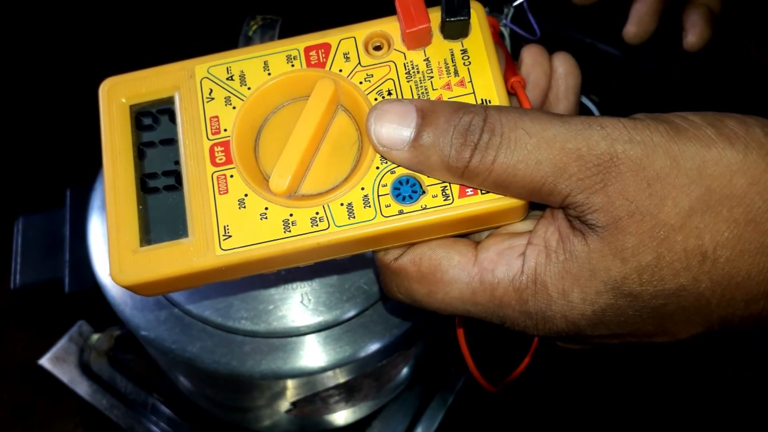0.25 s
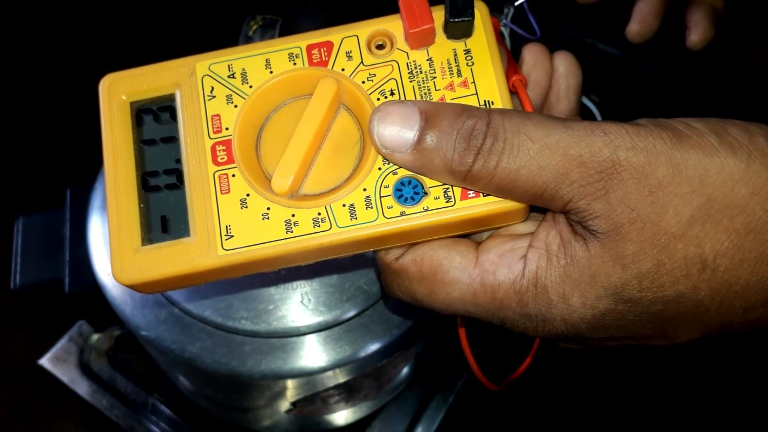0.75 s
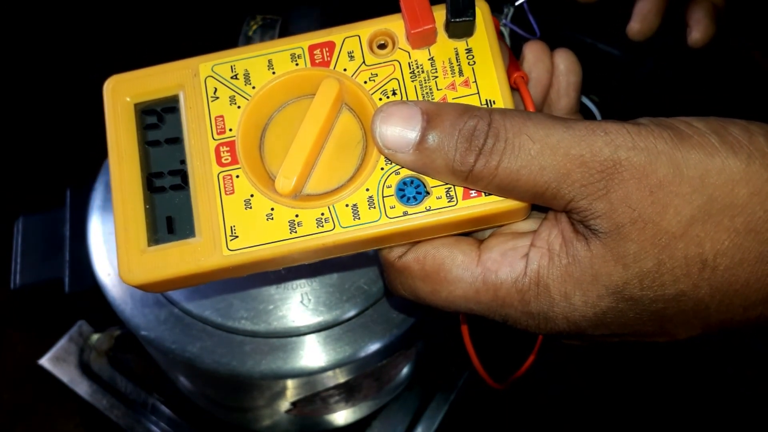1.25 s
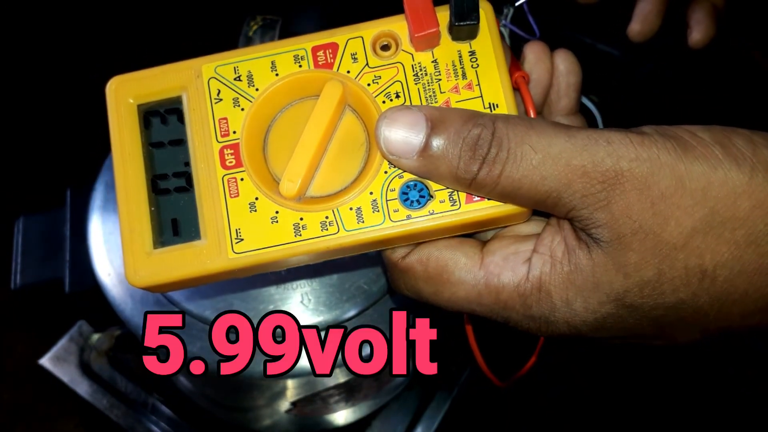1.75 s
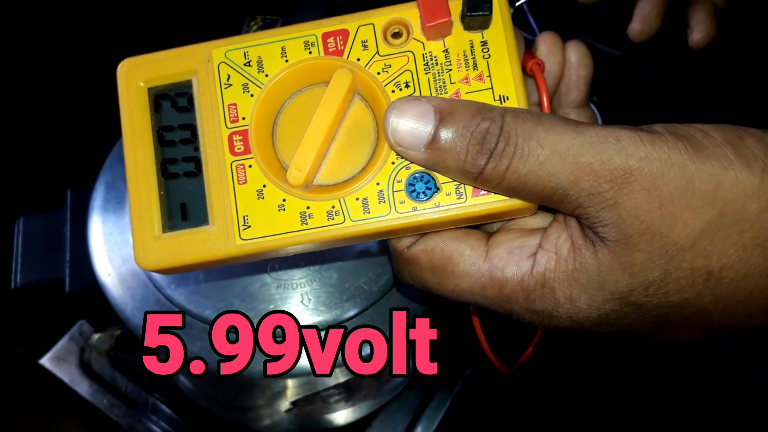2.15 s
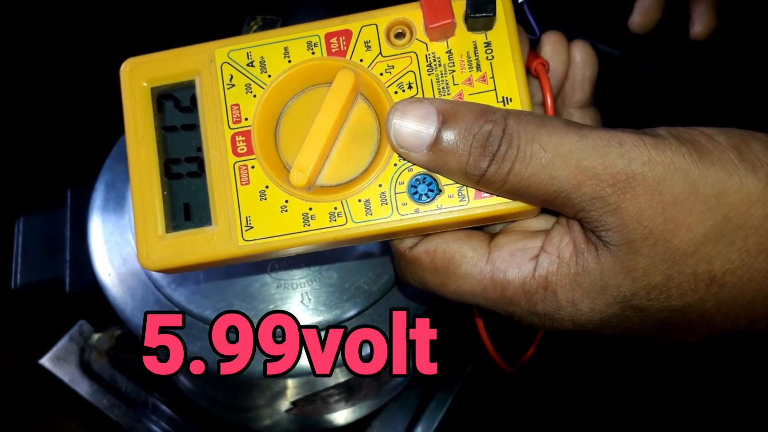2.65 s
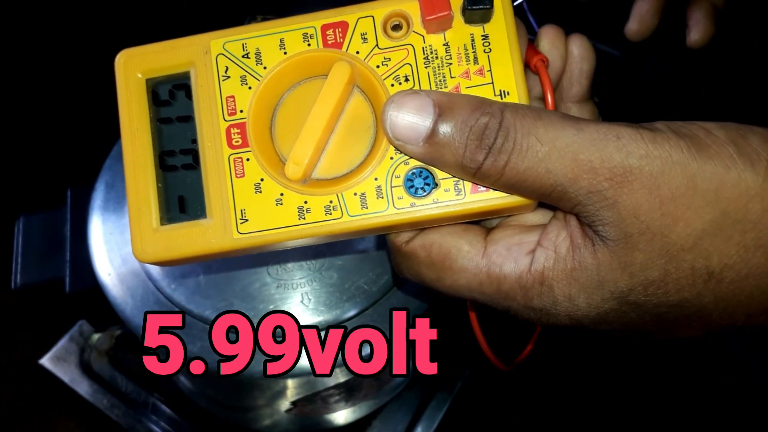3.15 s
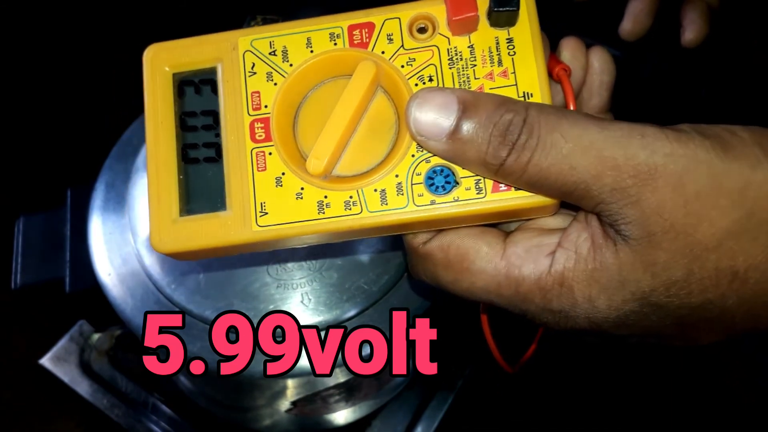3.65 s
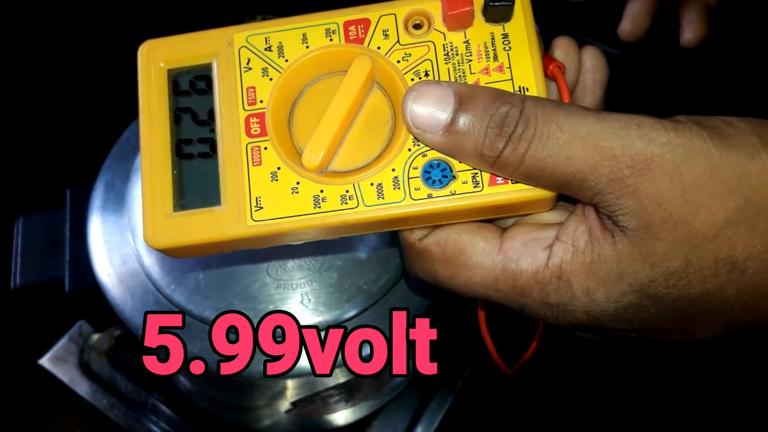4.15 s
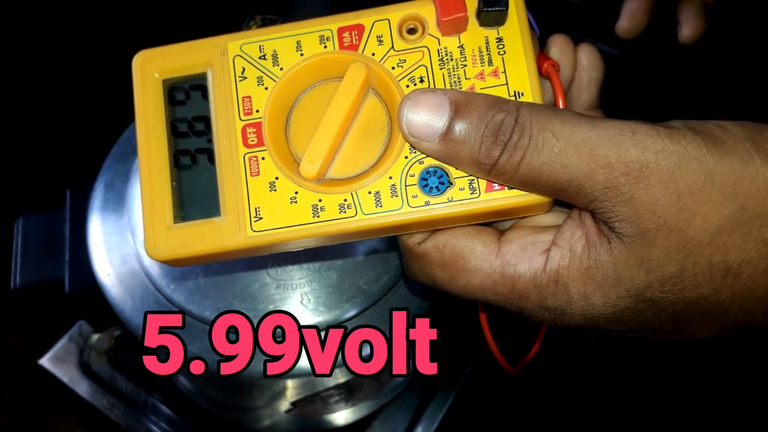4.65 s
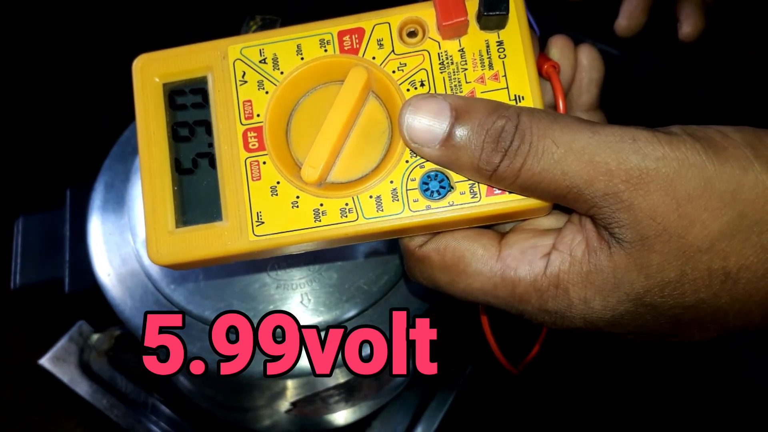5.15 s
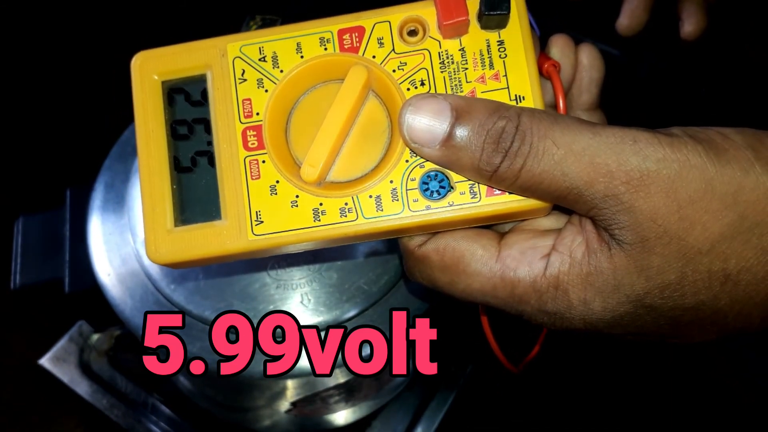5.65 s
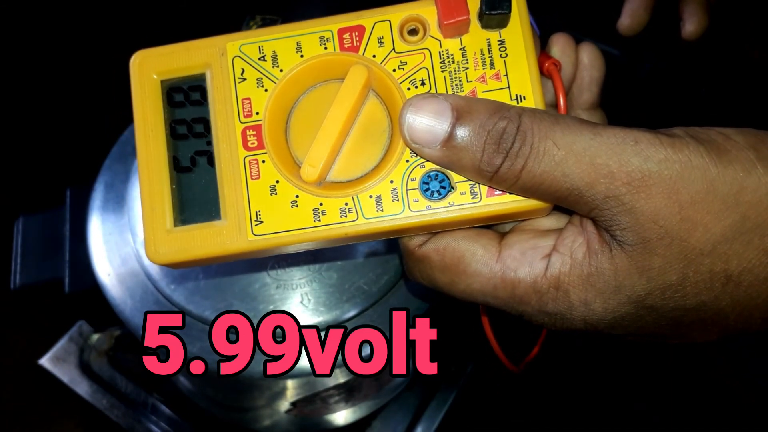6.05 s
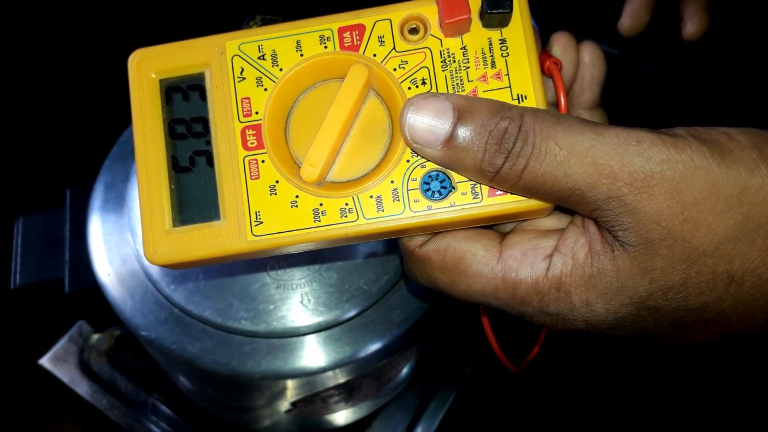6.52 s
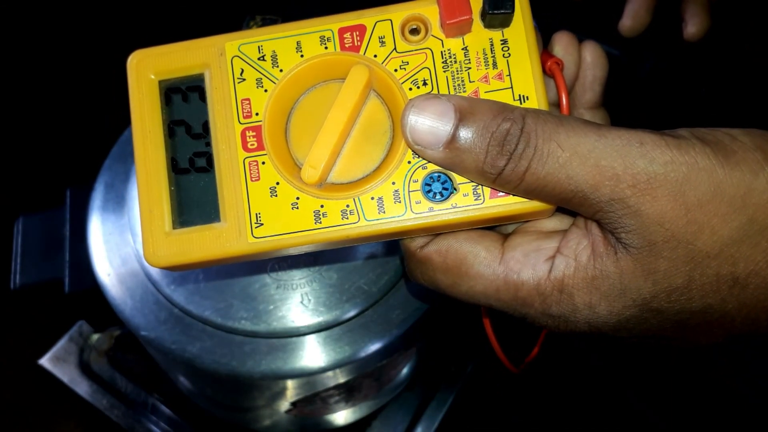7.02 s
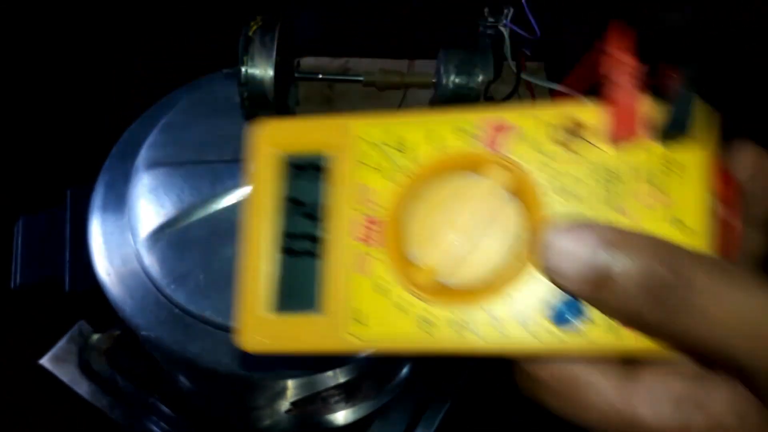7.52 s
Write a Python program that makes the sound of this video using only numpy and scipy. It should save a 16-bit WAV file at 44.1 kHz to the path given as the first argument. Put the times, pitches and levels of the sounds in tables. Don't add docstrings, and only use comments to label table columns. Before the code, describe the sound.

Continuous close steam jet chopped by spinning blades into a rough, buzzing hiss, over a very quiet uneven hum from a tiny generator on wood.

```python
import sys
import numpy as np
from scipy import signal
from scipy.io import wavfile
from scipy.ndimage import uniform_filter1d

SR = 44100
rng = np.random.default_rng(int(sys.argv[2]) if len(sys.argv) > 2 else 0)


def natural_amplitude(level_db):
    exponent = np.asarray(level_db, float) / 20
    return 10 ** exponent


def transcribe(signal):
    frames = np.atleast_2d(signal).T
    limited = np.clip(frames, -1, 1)
    pcm = np.round(limited * 32767).astype(np.int16)
    wavfile.write(sys.argv[1], SR, pcm)


N = 343092

# [t/s, level/dB]
PRESSURE = [(0.0, -17), (0.02, -19.5), (0.76, -18.5), (2.38, -19), (3.01, -16), (3.14, -18), (3.83, -19),
            (4.44, -20.5), (4.92, -19), (5.05, -19.5), (5.41, -17.5), (6.07, -18.5), (6.3, -18),
            (6.46, -20), (6.65, -18), (7.15, -19.5), (7.43, -17), (7.78, -15.5)]
PRESSURE_SHARE = [0.11, 0.88, 1.35]
ZONES_HZ = [2600, 8000, 13500]
# [t/s, level/dB]
HAND_SHADE = [
    (0, 2.5),
    (.2, 2),
    (1.1, -0.5),
    (3.2, 0.2),
    (3.75, 0),
    (4.9, -0.8),
    (5.9, .5),
    (6.6, -0.7),
    (7.78, -0.2),
]
# [t/s, length/s, level/dB]
CHOKES = [(1.7, .08, 2), (2.3, .3, -0.5), (2.9, .15, -2), (3.5, 0.072, -1.5), (3.82, .1, 1),
          (4.2, 0.087, -2.5), (4.5, .07, -2), (5.35, .15, 1.2), (6.27, .08, 1.5), (6.78, .08, 1),
          (6.95, .12, -1), (7.6, .2, -1.2)]
# [f/Hz, density/(dB per Hz)]
HISS_COLOUR = [(700, -26), (900, -27), (1500, -13), (1900, -12.5), (2300, -8), (3300, -9), (4600, -8),
               (5600, -3), (7000, -6), (8200, -9), (10000, -3.5), (12300, -5.5), (14000, -5), (16000, -14)]
# [f/Hz, chopped share/0-1, crispness/0-1]
CHOPPED = [(900, .18, .5), (2500, .24, .7), (4200, .4, .3), (6500, .42, .3), (10000, .56, .5),
           (14000, .56, .95)]
BLADES_DB = [1, -2, -4, -3, -3, 2, 3.5, .5]
# [f/Hz, width/Hz, lift/dB]
HOUSING = [(1405, 19, -2.5), (1735, 57, 3.5), (2063, 176, 4), (2555, 537, 8), (3935, 210, 4.5),
           (4260, 170, 2.5), (5800, 99, 4), (5550, 350, 2.5), (6790, 180, 2.5), (7020, 460, 6.5),
           (9040, 800, 7.5), (10490, 400, 6.5), (997, 80, 9), (11370, 160, 1.5)]
BLADE_LEAD = .06
JET_DB, DRONE_DB = -17.5, -44
SIZZLE_WAVER_DB = .4
TOP_PATCHY_DB = 0.7

# [t/ms, gain]
DULL_ECHOES = [(2.31, 0.07), (3.2, -0.07), (5.08, -0.06), (5.37, 0.06), (5.69, 0.15), (7.05, 0.06),
               (7.32, 0.05), (8.93, 0.05), (9.34, 0.06), (10.7, -0.05), (11.02, -0.07), (11.52, 0.05)]
# [t/ms, gain]
BRIGHT_ECHOES = [(2.7, 0.03), (3.15, -0.03), (4.78, 0.03), (4.99, -0.03), (5.19, 0.03), (5.42, 0.03),
                 (5.62, 0.06), (5.71, -0.03), (5.78, -0.03), (6.01, -0.03), (6.85, 0.04), (6.92, -0.03),
                 (7.23, 0.03), (9.25, 0.03)]
SPLIT_HZ = 4600
ROOM_T60_S, ROOM_DB, ROOM_CUT_HZ = .16, -12.5, 4300

# [t/s, turns per s]
SPEED = [(0.0, 43.8), (0.08, 44.4), (0.89, 44.8), (1.58, 43.6), (2.27, 45.5), (2.73, 43.8), (3.01, 43.5),
         (3.92, 44.2), (3.99, 44.8), (4.53, 43.7), (5.68, 43.6), (5.79, 44.3), (6.35, 44.4), (6.54, 45.0),
         (6.98, 44.8), (7.26, 43.8), (7.69, 43.4), (7.78, 43.8)]
# [multiple of speed, rms level/dB]
HUM = [(2, -71.0), (3, -64.6), (5, -59.9), (7, -55.3), (8, -57.0), (10, -69.2), (11, -55.4), (13, -61.2),
       (14, -63.0), (15, -54.0), (16, -54.1), (17, -59.0), (18, -60.9), (21, -64.5), (24, -56.1),
       (25, -59.0), (28, -60.0), (29, -59.6), (32, -55.4)]
EXCITES = {7: 1, 11: 2}
PAIR_TONES = (16, 24)
PAIR_DB_PER_HZ = 2.5

# [f/Hz, density/(dB per Hz)]
DRONE_COLOUR = [(25, -33), (45, -29), (80, -18), (195, -15.5), (240, -11), (330, -6.5), (455, -10.5),
                (600, -6.5), (850, -17), (1300, -10.5)]
# [f/Hz, width/Hz, level/dB]
BASE_MODES = [
    (245.5, 6.3, 4),
    (293.6, 17, -3.5),
    (484, 6.1, -4.5),
]
REST_DB = [-57, -50.5, -56]
DETUNE_DB_PER_HZ = [1, -3, -1.5]
# [t/s, length/s, level from rest/dB]
LOW_SWELLS = [
    (.37, 0.071, 9),
    (1.71, .1, 5),
    (2.27, .15, 4),
    (2.86, .12, -11),
    (3.38, 0.13, 7.5),
    (3.96, .08, 7),
    (5.07, 0.14, 7),
    (6.0, .1, 9.5),
]
# [t/s, length/s, level from rest/dB]
MIDDLE_SWELLS = [(.4, .1, 6), (1.4, 0.17, 5.5), (2.05, 0.13, -9), (2.86, 0.2, 5), (3.55, 0.084, 7),
                 (4.4, .2, 5.5), (5.5, .25, 6.5), (6.2, .1, 9.5), (6.5, .06, -12), (6.65, .1, 6),
                 (7.11, .15, 9.5)]
# [t/s, length/s, level from rest/dB]
HIGH_SWELLS = [(.45, .1, 8), (1.06, 0.071, 14), (1.38, .1, 13), (1.71, 0.055, 4), (2.1, .1, 7),
               (2.95, .1, -9), (4.22, 0.23, 10.5), (4.9, .3, 5), (5.87, .08, 12), (6.4, 0.067, 7),
               (6.8, 0.32, 5)]

# [f/Hz, width/Hz, lift/dB]
PORT = [(14000, 710, 4)]
CUTOFF_HZ = 15490


def rms_one(x):
    return x / np.sqrt(np.mean(x ** 2) + 1e-20)


def in_time(rows):
    s, *columns = np.transpose(rows)
    return [np.interp(np.arange(N) / SR, s, c) for c in columns]


def at_hz(points, hz, column=1):
    table = np.array(points)
    return np.interp(np.log(hz), np.log(table[:, 0]), table[:, column])


def swells(rows):
    t = np.arange(0, N + 64, 64) / SR
    bumps = sum(db * np.exp(-((t - s) / length) ** 2) for s, length, db in rows)
    return np.interp(np.arange(N) / SR, t, bumps)


def drift(*rates_and_spreads):
    hop, settle = 40, 2000
    slow = 0
    for rate, spread in rates_and_spreads:
        r = np.exp(-2 * np.pi * hop * rate / SR)
        noise = rng.standard_normal(N // hop + settle + 2)
        smooth = signal.lfilter([1], [1, -2 * r, r * r], noise)[settle:]
        slow = slow + spread * rms_one(smooth)
    return np.interp(np.arange(N) / hop, np.arange(len(slow)), slow)


def band(x, low_hz, high_hz):
    return signal.sosfilt(signal.butter(2, [low_hz, high_hz], "band", fs=SR, output="sos"), x)


def ring(x, hz, width):
    r = np.exp(-np.pi * width / SR)
    poles = [1, -2 * r * np.cos(2 * np.pi * hz / SR), r * r]
    return signal.lfilter([(1 - r * r) / 2, 0, (r * r - 1) / 2], poles, x)


def lift(x, modes):
    for hz, width, lift_db in modes:
        x = x + (natural_amplitude(lift_db) - 1) * ring(x, hz, width)
    return x


def strikes(turns, fade, spread_db):
    place = 8 * turns - BLADE_LEAD
    blade = np.floor(place).astype(int) + 1
    part = place % 1
    uneven_db = spread_db * rng.standard_normal(4000)[blade]
    force_db = np.array(BLADES_DB)[(blade - 1) % 8] + uneven_db
    return rms_one(natural_amplitude(force_db) * part * np.exp(-part / fade))


def hiss_swells_db():
    pressure_db, = in_time(PRESSURE)
    swells_db = np.outer(PRESSURE_SHARE, pressure_db - pressure_db.mean())
    swells_db[0] += in_time(HAND_SHADE)[0]
    swells_db[2] += swells(CHOKES) + drift((4, SIZZLE_WAVER_DB))
    return swells_db


def jet(turns):
    swells_db = hiss_swells_db()
    white = rng.standard_normal((4, N))
    droplets = rms_one(natural_amplitude(1.6 * np.minimum(rng.exponential(1, N), 5)))
    crisp = strikes(turns, fade=.24, spread_db=1.5)
    blurred = rms_one(uniform_filter1d(crisp, size=125))
    gust_db = drift((12.0, .25))
    out = 0
    edges = np.geomspace(650, 17500, 26)
    for k, (low, high) in enumerate(zip(edges, edges[1:])):
        hz = np.sqrt(low * high)
        share, crispness = np.clip([at_hz(CHOPPED, hz), at_hz(CHOPPED, hz, column=2)], 0, 1)
        spatter = np.roll(droplets, 999 * (k // 3))
        chop = spatter * (crispness * crisp + (1 - crispness) * blurred)
        free_jet = np.sqrt(1 - share) * white[k % 2]
        chopped_jet = np.sqrt(share) * chop * white[2 + k % 2]
        zone = np.interp(np.log(hz), np.log(ZONES_HZ), [0, 1, 2])
        swell_db = sum(max(0, 1 - abs(zone - z)) * s for z, s in enumerate(swells_db))
        patchy_db = 0.43 + TOP_PATCHY_DB * max(0, zone - 1)
        flicker_db = gust_db + drift((2.2, patchy_db), (15, .45))
        level = natural_amplitude(at_hz(HISS_COLOUR, hz) + swell_db + flicker_db)
        out = out + level * band(free_jet + chopped_jet, low, high)
    return natural_amplitude(JET_DB) * rms_one(lift(out, HOUSING))


def echoes(x, table, strength):
    taps = np.zeros(SR // 50)
    taps[0] = 1
    for ms, gain in table:
        taps[round(ms * SR / 1000)] += strength * gain
    return signal.fftconvolve(x, taps)[:N]


def near_surfaces(hiss):
    dull = signal.sosfiltfilt(signal.butter(4, SPLIT_HZ, fs=SR, output="sos"), hiss)
    bright = hiss - dull
    return echoes(dull, DULL_ECHOES, strength=1.46) + echoes(bright, BRIGHT_ECHOES, strength=0.72)


def room(x):
    t = np.arange(SR // 4) / SR
    tail = rng.standard_normal(len(t)) * natural_amplitude(-60 * t / ROOM_T60_S) * (t > .004)
    tail = band(tail, ROOM_CUT_HZ, 15400)
    return signal.fftconvolve(x, natural_amplitude(ROOM_DB) * tail / np.sqrt(np.sum(tail ** 2)))[:N]


def ringing_db(speed):
    rest_db = np.array(REST_DB)[:, None] + np.outer(DETUNE_DB_PER_HZ, speed - speed.mean())
    return rest_db + [swells(rows) for rows in (LOW_SWELLS, MIDDLE_SWELLS, HIGH_SWELLS)]


def shaft(turns, speed, modes_db):
    out = 0
    for multiple, level_db in HUM:
        phase = 2 * np.pi * (multiple * turns + rng.random()) + drift((3, .25))
        swell_db = drift((2, 2.))
        if multiple in EXCITES:
            mode_db = modes_db[EXCITES[multiple]]
            swell_db = mode_db - mode_db.mean()
        if multiple in PAIR_TONES:
            swell_db = 0.49 * swell_db + PAIR_DB_PER_HZ * (speed - speed.mean())
        out = out + np.sqrt(2) * natural_amplitude(level_db + swell_db) * np.sin(phase)
    return out


def base(modes_db):
    white = rng.standard_normal((5, N))
    rumble = 0
    edges = np.geomspace(20, 1500, 16)
    for k, (low, high) in enumerate(zip(edges, edges[1:])):
        level_db = at_hz(DRONE_COLOUR, np.sqrt(low * high)) + drift((2.5, .8))
        rumble = rumble + natural_amplitude(level_db) * band(white[k % 2], low, high)
    out = natural_amplitude(DRONE_DB) * rms_one(rumble)
    for noise, level_db, (hz, width, mode_db) in zip(white[2:], modes_db, BASE_MODES):
        tone = ring(ring(noise, hz, width), hz, width)
        power = uniform_filter1d(tone ** 2, size=6000)
        evened = tone / np.sqrt(power + .2 * np.mean(tone ** 2))
        out = out + natural_amplitude(level_db + mode_db) * evened
    return out


def scene():
    speed, = in_time(SPEED)
    turns = np.cumsum(speed) / SR
    modes_db = ringing_db(speed)
    hiss = jet(turns)
    hum = natural_amplitude(1.1) * shaft(turns, speed, modes_db)
    return (near_surfaces(hiss) + room(hiss) + hum + base(modes_db))[None]


def band_limit(x):
    return signal.sosfilt(signal.butter(12, 16080, fs=SR, output="sos"), x)


def record(dry):
    rounded = 1.4 * np.tanh(lift(dry, PORT) / 1.4)
    bass_cut = signal.butter(2, 60, "high", fs=SR, output="sos")
    top_cut = signal.ellip(14, .5, 90, CUTOFF_HZ, fs=SR, output="sos")
    mix = signal.sosfilt(np.vstack([bass_cut, top_cut]), rounded)
    return band_limit(mix)


dry = scene()
out = record(dry)
transcribe(out)
```